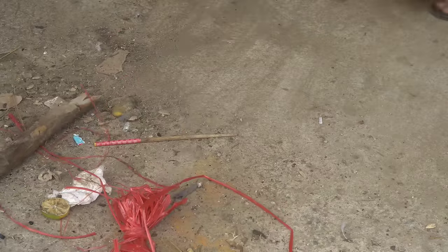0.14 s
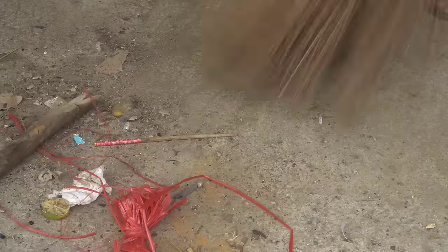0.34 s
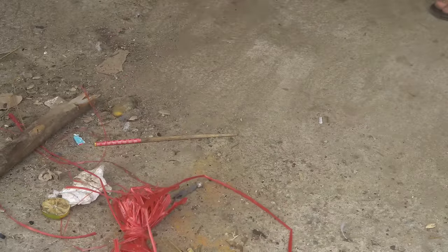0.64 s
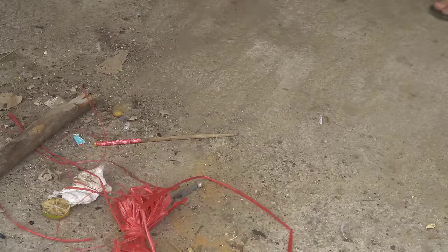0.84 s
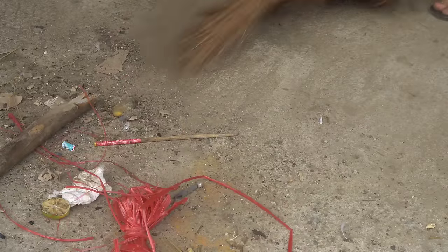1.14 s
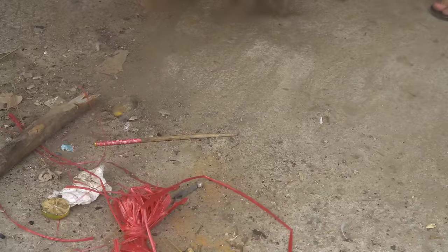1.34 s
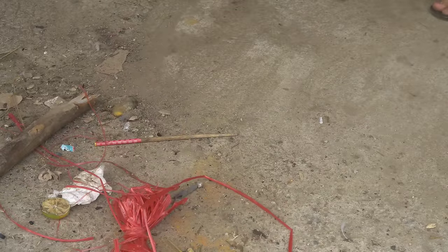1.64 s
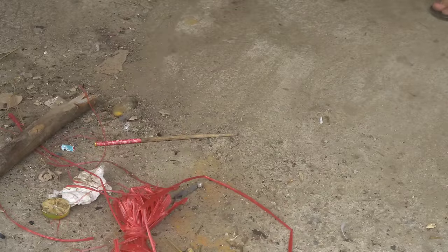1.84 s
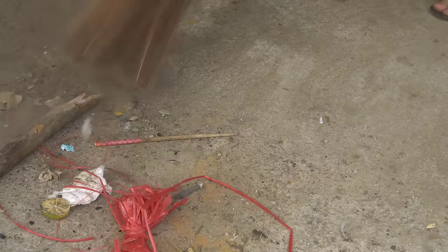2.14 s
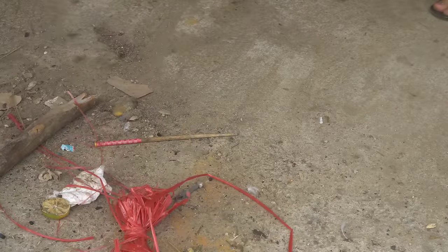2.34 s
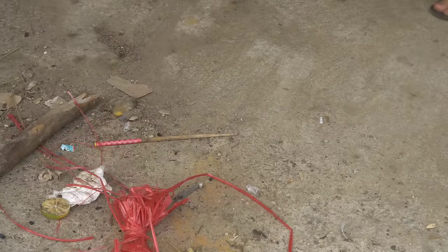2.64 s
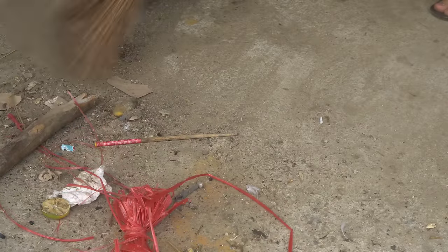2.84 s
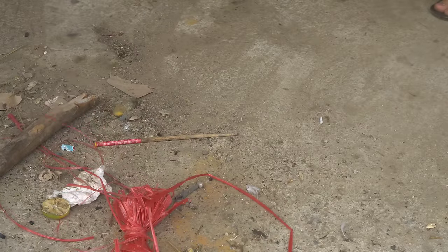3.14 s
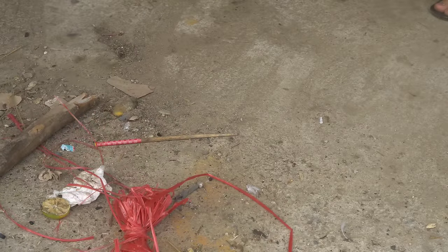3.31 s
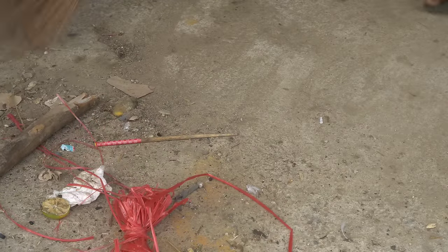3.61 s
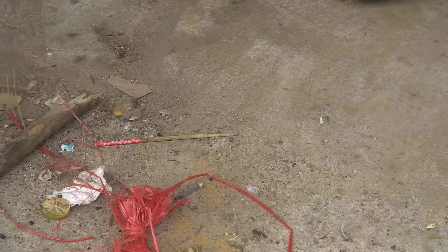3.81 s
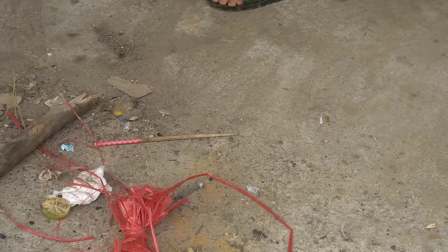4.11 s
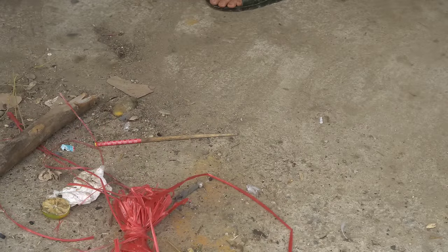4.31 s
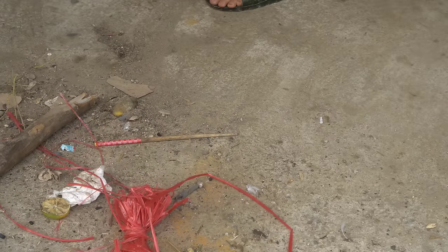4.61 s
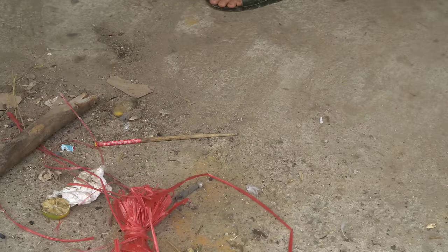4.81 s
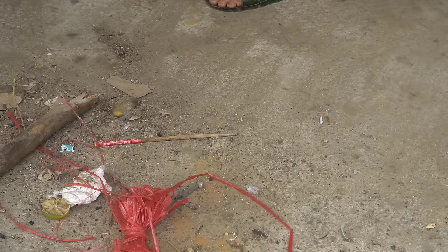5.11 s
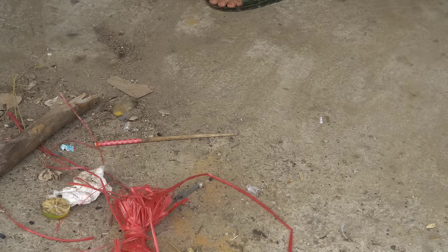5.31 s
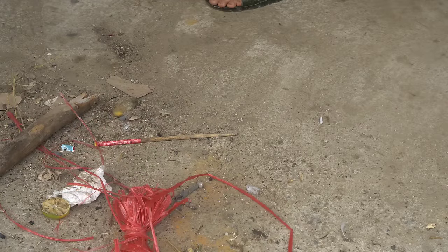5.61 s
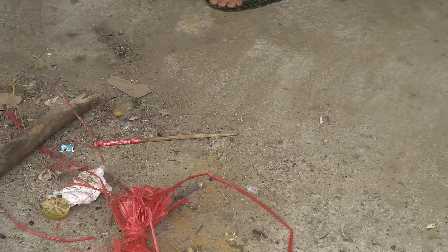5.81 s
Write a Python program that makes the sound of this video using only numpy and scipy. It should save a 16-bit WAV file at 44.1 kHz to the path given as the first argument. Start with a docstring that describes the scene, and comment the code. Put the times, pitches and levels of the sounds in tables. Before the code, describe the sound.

A broom scratches across gritty concrete in a regular rhythm, bright and dry, starting narrow in the centre and fanning wider with each stroke. Light grazes sound as it swings back, and stones click. A brief sliding squeak comes before the third stroke and a hollow scrape near the end. Quiet open yard, faint distant hum, soft low thumps of air on a nearby stereo microphone.

```python
"""Sweeping a yard with a stiff broom

A broom of dried stalks makes eight strokes on concrete: random ticks, coloured as hiss and rasp.
Sandals scuff (gritty noise), grit ticks (short rings), and gliding fuzzy tones whistle, slide and scrape.
Uneven low noise buffets the microphone over a faint hum of sines and a quiet outdoor background.
"""
import sys
import numpy as np
from scipy import signal
from scipy.fft import rfft, irfft, next_fast_len
from scipy.io import wavfile
from scipy.ndimage import uniform_filter1d, map_coordinates

SR = 44100
rng = np.random.default_rng(int(sys.argv[2]) if len(sys.argv) > 2 else 0)


def to_wav(sig):
    """Store sig (one row per channel, or 1-D mono) as 16-bit WAV at the path in sys.argv[1].

    Samples outside -1..1 are clipped; the rate is SR.
    """
    pcm = np.clip(np.atleast_2d(sig), -1, 1) * 32767
    pcm = np.round(pcm).astype(np.int16)
    wavfile.write(sys.argv[1], SR, pcm.T)  # frames by channels


N = 262395  # length in samples


def amp(db):
    """Turn decibels into a gain."""
    return 10 ** (np.asarray(db) / 20)


def unit(x):
    """Scale to an rms (average strength) of 1."""
    return x / np.sqrt(np.mean(x ** 2) + 1e-20)


def clock():
    """The time of every sample in seconds."""
    return np.arange(N) / SR


def along(points, hz):
    """Read a curve of (Hz, value) points on a logarithmic pitch axis."""
    f, v = np.transpose(points)
    return np.interp(np.log(hz + 1), np.log(f + 1), v)


def curves(rows):
    """Join the rows into one smooth-running value per sample for each column after the time."""
    s, *cols = np.transpose(rows)
    return [np.interp(clock(), s, c) for c in cols]


def wobble(rate):
    """A smooth random curve through `rate` random points a second."""
    points = rng.standard_normal(int(N * rate / SR) + 4)
    return map_coordinates(points, [np.arange(N) * rate / SR])


def ramp(t, rise_s):
    """A smooth step from 0 to 1 that starts at t = 0."""
    return np.sin(np.pi / 2 * np.clip(t / rise_s, 0, 1)) ** 2


def filtered(x, response):
    """Multiply the spectrum of x by a response that depends on frequency."""
    size = next_fast_len(x.shape[-1] + 8192)  # spare room so the end does not wrap to the start
    spectrum = rfft(x, size) * response(np.fft.rfftfreq(size, 1 / SR))
    return irfft(spectrum, size)[..., :x.shape[-1]]


def stereo(pair, colour, side_db):
    """Turn two unrelated signals into a coloured left and right of rms 1."""
    mid, side = filtered(pair, lambda hz: amp(colour(hz)))
    side = amp(side_db) * side
    return unit(np.array([mid + side, mid - side]))


def noise(spectrum, side_db):
    """Stereo noise of rms 1 with the given spectrum."""
    return stereo(rng.standard_normal((2, N)), lambda hz: along(spectrum, hz), side_db)


def fuzzy_tone(rows, blur_hz):
    """Noise in one narrow resonance: a tone that follows the rows, blurred by random wobbling."""
    pitch_hz, db = curves(rows)
    phase = 2 * np.pi * np.cumsum(pitch_hz) / SR
    tone = wobble(blur_hz) * np.cos(phase) + wobble(blur_hz) * np.sin(phase)
    return amp(db) * unit(tone)


# Colour of the outdoor background. Each row: pitch in Hz, relative level in dB.
YARD_COLOUR = [(30, -20), (70, -30), (150, -10.5), (300, -5.5), (600, 1.5), (1200, 0), (3000, -4.5),
               (8000, -6), (15000, -5)]
# How loud the background is over time. Each row: time in seconds, level in dB.
BACKGROUND_LEVEL = [(0, -40), (.8, -48.5), (2.2, -51), (3.3, -49), (4.4, -54.5), (5.95, -47)]
# Tones of the far hum. Each row: pitch in Hz, rms level in dB.
HUM_TONES = [(59.5, -64), (72, -59), (240.5, -67.5), (349.5, -71), (421, -77), (479, -71), (561, -69.5),
             (712, -73), (796, -75.5)]


def yard():
    """Broad noise for the outdoors, and sines with wandering phase for a slightly unsteady far hum."""
    t = clock()
    hum = 0
    for hz, db in HUM_TONES:
        hum = hum + amp(db) * np.sqrt(2) * np.sin(2 * np.pi * hz * t + 1.4 * wobble(6.7))
    background_db, = curves(BACKGROUND_LEVEL)
    return hum + amp(background_db) * noise(YARD_COLOUR, side_db=-8.0)


# Colour of air pushing on the microphone. Each row: pitch in Hz, relative level in dB.
BUFFET_COLOUR = [(15, -28), (30, -4), (50, 2.5), (80, 4), (120, -2), (170, -12), (260, -20.5), (500, -29),
                 (1200, -66)]
# Colour of small eddies at each microphone port. Each row: pitch in Hz, relative level in dB.
EDDY_COLOUR = [(40, -1), (90, 8.5), (130, 0.5), (220, -5.5), (350, -29), (800, -29)]
# Gusts on the microphone. Each row: start in seconds, length in seconds, level in dB.
GUST_TIMES = [(-.02, 0.2, -42), (.17, 0.4, -48), (0.631, 0.51, -43.5), (1.087, 0.47, -46.5),
              (1.603, 0.28, -42.5), (1.75, 0.23, -39), (2.518, 0.246, -42), (3.035, 0.66, -47.5),
              (3.215, 0.14, -39.5), (3.71, 0.48, -45.5), (4.42, 0.35, -52), (4.826, 0.31, -46),
              (5.144, 0.19, -40.5), (5.31, .38, -44), (5.714, .16, -43)]
# Sharp puffs of air. Each row: time of the peak in seconds, level in dB.
PUFF_TIMES = [(.13, -32.5), (.97, -39), (1.92, -49), (2.69, -47), (3.291, -60.5), (3.76, -43),
              (4.872, -38.5), (5.215, -38.5), (5.256, -29.5), (5.322, -33)]
GUST_EDGE_S, CALM_DB = 0.031, -58  # rise and fall of a gust; the air between gusts
EDDY_DB = -10.5  # eddies relative to the gust that sheds them


def wind():
    """Gusts thump the microphone in uneven lumps; gusts and sharp puffs shed eddies at each port."""
    t = clock()
    power = amp(CALM_DB) ** 2
    for s, length, db in GUST_TIMES:
        swell = ramp(t - s, GUST_EDGE_S) * ramp(s + length - t, GUST_EDGE_S)
        power = power + (amp(db) * swell) ** 2
    air = np.sqrt(power)
    lumps = amp(1.26 * wobble(24))
    push = air * unit(noise(BUFFET_COLOUR, side_db=-14.0) * lumps)
    puffs = sum(amp(db) * np.exp(-((t - s) / 0.0093) ** 2) for s, db in PUFF_TIMES)
    return push + (amp(EDDY_DB) * air + puffs) * noise(EDDY_COLOUR, side_db=-4)


# The broom strokes. Each row: start in seconds, hiss at first touch in dB, how fast the touch fades in dB
# per second (negative grows), touch length in seconds, hiss of the push in dB, push length in seconds,
# fade as the broom lifts in dB per second, rasp at the touch in dB, rasp at full pressure in dB,
# treble tilt at first touch in dB per octave, relative stereo spread at first touch and at the end in dB.
BROOM_STROKES = [(0.021, -23.5, 28, 0.087, -17.5, .37, 83.5, -29, -30, 7, -9, -3),
                 (0.885, -17.5, 42.5, 0.1, -17, 0.5, 94, -28, -28.5, 8, -11, -2.5),
                 (1.861, -22, 15, 0.065, -17, .23, 79.5, -32.5, -28.5, 5.5, -12, 3),
                 (2.602, -32, -28, 0.12, -17.5, .29, 70.5, -39, -29.5, 9, -10, -1),
                 (3.413, -24.5, -10, 0.12, -18, 0.23, 78.5, -33, -30, 2, -8, -2),
                 (4.098, -23.5, 8.5, 0.16, -20.5, 0.27, 100.5, -33.5, -31, -2, -7.5, 1),
                 (4.883, -28, -7, 0.15, -19.3, .21, 79, -36.5, -30.5, 6, -7.5, 0),
                 (5.597, -27.5, 4.5, .225, -18.5, 0.1, 88, -37, -32, -1, -5.5, -2)]
# The tips graze the ground as the broom swings back.
# Each row: start in seconds, length in seconds, hiss in dB, rasp in dB.
RETURN_GRAZES = [(1.74, 0.089, -41.5, -44), (1.817, 0.09, -36, -44), (3.14, 0.088, -35, -35.5),
                 (3.304, 0.17, -36.5, -41.5), (3.896, 0.06, -32, -39), (3.974, 0.32, -38, -42),
                 (5.537, 0.21, -44, -48), (5.686, 0.11, -21.5, -36.5)]
TOUCH_RISE_S, RASP_RISE_S = 0.018, 0.025  # the tips land first, the stalks follow
PUSH_RISE_S, PUSH_SAG_DB = 0.047, 2.5  # the arm speeds up; the hiss eases over the push
# The rasp grows by PRESS_DB up to this share of the push; it fades at this share of the hiss's rate.
PRESS_DB, PRESS_PEAK, RASP_FADE = 5, 0.83, 0.79


def sweep():
    """Levels in dB of hiss and rasp as each stroke touches, pushes and lifts; the return may graze."""
    hiss, rasp = np.zeros((2, N))  # summed as power
    for s, touch_db, touch_fade, touch_s, push_db, push_s, fade, touch_rasp_db, rasp_db, *_ in BROOM_STROKES:
        t = clock() - s
        pushing = ramp(t - touch_s, PUSH_RISE_S)
        touching = (1 - pushing) * amp(-touch_fade * np.clip(t, 0, touch_s + PUSH_RISE_S))
        bend = np.clip((t - touch_s) / push_s, 0, 1)
        slack_db = PRESS_DB * (1 - bend / PRESS_PEAK) ** 2
        lift_db = fade * np.maximum(t - touch_s - push_s, 0)
        touch_hiss = touching * ramp(t, TOUCH_RISE_S) * amp(touch_db)
        push_hiss = pushing * amp(push_db - PUSH_SAG_DB * bend - lift_db)
        hiss += (touch_hiss + push_hiss) ** 2
        touch_rasp = touching * ramp(t, RASP_RISE_S) * amp(touch_rasp_db)
        push_rasp = pushing * amp(rasp_db - slack_db - RASP_FADE * lift_db)
        rasp += (touch_rasp + push_rasp) ** 2
    for s, length, hiss_db, rasp_db in RETURN_GRAZES:
        swell = np.sin(np.pi * np.clip((clock() - s) / length, 0, 1) ** 0.42) ** 2
        hiss += swell * amp(hiss_db) ** 2
        rasp += swell * amp(rasp_db) ** 2
    return 10 * np.log10(np.array([hiss, rasp]) + 1e-9)


def slips(level_db, spectrum, full_rate, thinning):
    """Stalks catch and slip at random (full_rate a second); the lighter the touch, the fewer take part."""
    share = full_rate / SR * amp(thinning * (level_db - level_db.max()))
    share = np.clip(share, 1e-3, 1)
    ticks = (rng.random((2, N)) < share) * rng.standard_normal((2, N))
    ticks = ticks / np.sqrt(share)  # fewer ticks are stronger, so the level is set below alone
    return amp(level_db) * unit(filtered(ticks, lambda hz: amp(along(spectrum, hz))))


# Colour of the hissing stalk tips. Each row: pitch in Hz, relative level in dB.
TIP_COLOUR = [(1500, -37), (4000, -12), (7000, -8), (10000, -2.5), (12500, -2), (15300, -1.5)]
# Colour of the rasping, pressed stalks. Each row: pitch in Hz, relative level in dB.
STALK_COLOUR = [(250, -28.5), (700, -23.5), (1200, -13), (1700, -10), (2200, -4.5), (3000, -2),
                (4500, -4.5), (7000, -3), (10000, -4.5), (15000, -22)]
# The treble spreads wider than the middle. Each row: pitch in Hz, relative side level in dB.
SPREAD_BY_PITCH = [(300, -51), (1400, -10), (3100, -7.5), (6000, -0.5), (10000, 0), (15000, 0.5)]
# The broom works its way to the left: left minus right at 13 kHz, at the start and its change.
PLACE_DB, DRIFT_DB_PER_S = -0.9, 0.77


def broom():
    """Light tips hiss and pressed stalks rasp; their colour and stereo spread change along each stroke."""
    tips_db, stalks_db = sweep()
    tips = slips(tips_db, TIP_COLOUR, full_rate=40000, thinning=.55)
    stalks = slips(stalks_db, STALK_COLOUR, full_rate=26000, thinning=.55)
    # bundles of stalks judder together over the rough ground
    judder = amp(0.34 * wobble(14) + 0.61 * wobble(55) + 0.081 * wobble(260))
    hz, t, z = signal.stft((tips + stalks) * judder, SR, nperseg=256)
    start, *_, tilt_first, spread_first, spread_last = np.transpose(BROOM_STROKES)
    stroke = np.clip(np.searchsorted(start, t, side="right") - 1, 0, None)
    # progress runs from 0 to 1 until the next stroke
    progress = np.clip((t - start[stroke]) / np.diff(start, append=N / SR)[stroke], 0, 1)
    # the treble tilt of the first touch is soon lost as the stalks bend
    tilt_db = tilt_first[stroke] * np.exp(-progress / 0.13) - 0.39 * progress
    octaves = np.log2(np.maximum(hz, 7000) / 11000)[:, None]
    z = z * amp(tilt_db * octaves)
    # each stalk rings at its own pitches for as long as it drags, so the colour keeps shifting
    field = uniform_filter1d(rng.standard_normal(z.shape[1:]), size=2, axis=0)  # neighbouring pitches
    field = uniform_filter1d(field, size=24, axis=1)  # neighbouring moments
    mid, side = z * amp(1.14 * unit(field))
    # the stroke starts in front and fans out to the side
    spread_db = spread_first[stroke] + (spread_last - spread_first)[stroke] * progress
    side = side * amp(along(SPREAD_BY_PITCH, hz)[:, None] + spread_db)
    # mostly the treble shifts between left and right
    shade_db = (PLACE_DB + DRIFT_DB_PER_S * t) * (hz[:, None] / 13000)
    left = (mid + side) * amp(shade_db / 2)
    right = (mid - side) * amp(-shade_db / 2)
    return signal.istft(np.array([left, right]), nperseg=256)[1][:, :N]


# Sandal scuffs. Each row: start in seconds, length in seconds, level in dB, centre pitch in Hz,
# width in octaves.
SANDAL_SCUFFS = [(0.023, 0.18, -38.5, 580, 1.02), (0.151, 0.22, -46.5, 563, 0.56),
                 (0.887, 0.088, -37.5, 570, 1.2), (0.941, 0.096, -45, 453, 1.5),
                 (1.82, 0.11, -44.5, 623, 2), (1.954, 0.035, -47.5, 570, 0.28),
                 (2.631, 0.11, -56, 696, 0.4), (3.034, 0.17, -45.5, 700, 1.2),
                 (4.112, 0.22, -39.5, 1660, 1.1), (4.892, 0.22, -47.5, 1435, 1.3),
                 (5.425, 0.15, -45, 825, 0.96), (5.604, 0.092, -32.5, 1970, 0.76),
                 (5.589, 0.22, -35.5, 1080, 1.65), (5.883, 0.12, -50.5, 660, 0.23)]


def scuffs():
    """A sole drags briefly: a quick swell of dull, gritty friction with chance resonances."""
    out, t = np.zeros((2, N + SR)), np.arange(SR // 2) / SR
    for s, length, db, hz_mid, octaves in SANDAL_SCUFFS:
        # strongly uneven noise sounds like grains
        grains = rng.standard_normal((2, len(t))) * amp(5.0 * rng.standard_normal(len(t)))
        resonances = np.column_stack([np.geomspace(200, 5000, 64), rng.standard_normal(64)])

        def colour(hz):
            distance = np.log2((hz + 1) / hz_mid) / octaves
            return -14 * np.log10(1 + distance ** 4) + 4.0 * along(resonances, hz)

        rub = stereo(grains, colour, side_db=-11.5)
        swell = np.abs(np.sin(np.pi * np.clip(t / length, 0, 1) ** 0.54))
        out[:, round(s * SR):][:, :len(t)] += amp(db) * swell * rub
    return out[:, :N]


# Flicked grit. Each row: start in seconds, level in dB, pitch in Hz.
GRIT_TICKS = [(0.262, -26, 3960), (0.549, -17.5, 4130), (.889, -19, 11200), (1.031, -8, 13000),
              (1.714, -34.5, 5400), (1.962, -25, 3500), (2.443, -22.5, 2570), (2.468, -31, 7500),
              (2.472, -30, 1760), (2.494, -29.5, 3800), (2.544, -36, 8900), (2.626, -33, 12300),
              (2.638, -19.5, 12200), (4.59, -20.5, 3000)]


def grit():
    """Small stones and stalk ends tick on the concrete: a crack and a very short ring."""
    out, t = np.zeros((2, N + SR)), np.arange(SR // 20) / SR
    for s, db, hz in GRIT_TICKS:
        # each part falls by 60 dB in the given seconds
        ring = np.sin(2 * np.pi * hz * t) * amp(-60 * t / 0.0094)
        crack = np.diff(rng.standard_normal(len(t) + 1)) * amp(-60 * t / 0.0082)
        out[:, round(s * SR):][:, :len(t)] += amp(db) * (0.7 * ring + 0.38 * crack)
    return out[:, :N]


# Faint thin whistles far away. Each row: loudest moment in seconds, pitch in Hz, level in dB,
# fade in dB per second.
FAR_WHISTLES = [(.77, 1610, -56, 201.5), (4.61, 1475, -50.5, 71)]
WHISTLE_RISE_S = 0.058


def whistles():
    """Each far whistle is a fuzzy tone that swells quickly on one pitch and dies away."""
    t, out = clock(), 0
    for s, hz, db, fade in FAR_WHISTLES:
        swell = ramp(t - s + WHISTLE_RISE_S, WHISTLE_RISE_S)
        decay = amp(-fade * np.maximum(t - s, 0))
        out = out + fuzzy_tone([(s, hz, db)], blur_hz=80.8) * swell * decay
    return out


# Something slides over the ground and speeds up.
# Each row: time in seconds, pitch in Hz, level in dB before the roughness.
SLIDE_PATH = [(1.57, 1450, -67), (1.635, 1480, -44), (1.68, 1530, -42.5), (1.72, 1600, -39.5),
              (1.752, 1900, -42.5), (1.785, 1800, -43.5), (1.85, 1800, -61)]


def slide():
    """Sliding friction: a very blurred tone, mostly gliding upward, with a rough, uneven level."""
    return fuzzy_tone(SLIDE_PATH, blur_hz=1298) * amp(1.8 * wobble(70))


# A hollow scrape. Each row: time in seconds, pitch in Hz, level in dB.
SCRAPE_PATH = [(5.37, 567, -73), (5.415, 595, -47), (5.44, 589, -41.5), (5.48, 565.5, -50.5),
               (5.53, 576, -52), (5.63, 600, -47), (5.70, 679, -38.5), (5.74, 703, -50), (5.81, 682, -68)]


def scrape():
    """Scraping friction heard through one narrow, gliding resonance."""
    return fuzzy_tone(SCRAPE_PATH, blur_hz=85)


def scene():
    """Add all sounds in the open, without echo."""
    background = yard() + wind()
    sweeping = broom() + scuffs() + grit()
    return background + sweeping + whistles() + slide() + scrape()


TOP_HZ = 15620  # middle of the upper cutoff


def record(dry):
    """Remove everything above the band limit with a slope 300 Hz wide."""
    return filtered(dry, lambda hz: np.clip((TOP_HZ - hz) / 300 + .5, 0, 1))


dry = scene()
out = record(dry)
to_wav(out)
```